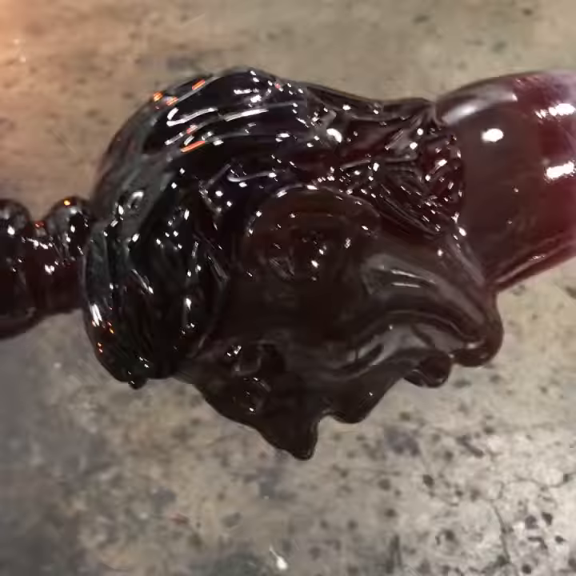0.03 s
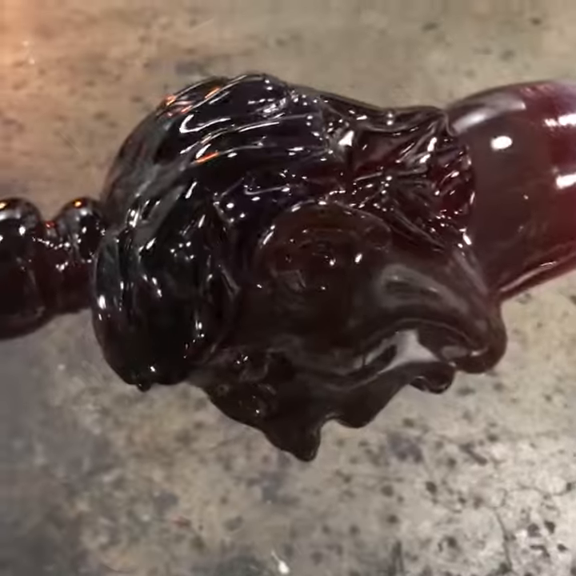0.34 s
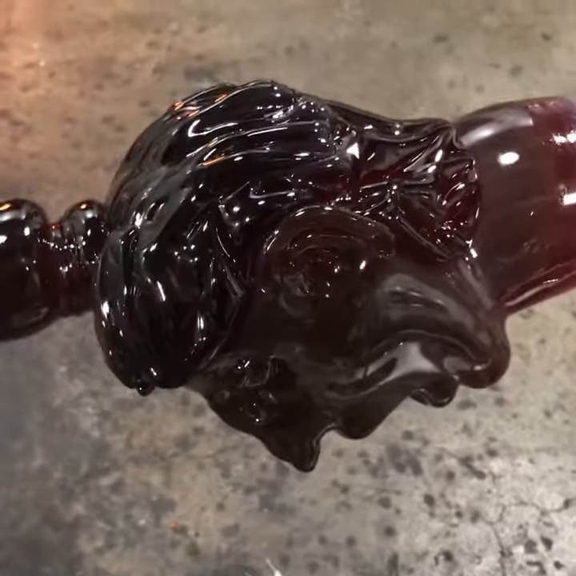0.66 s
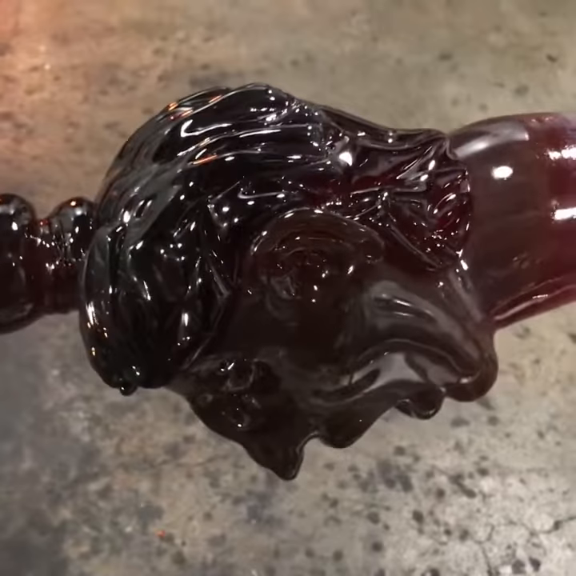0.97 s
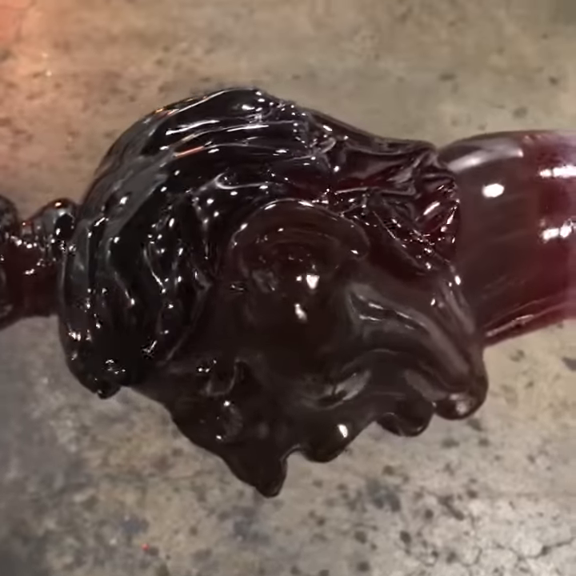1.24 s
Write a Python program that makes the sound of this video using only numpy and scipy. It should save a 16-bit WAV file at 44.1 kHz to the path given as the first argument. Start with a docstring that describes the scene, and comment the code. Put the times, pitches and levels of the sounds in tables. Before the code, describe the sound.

Gas furnaces roar steadily with rushing blower air in a large glass workshop.

```python
"""A large glass workshop, where gas furnaces and their blowers run without pause.
Turbulent flames lay down a low, throbbing roar, and the blowers fill the hall with rushing air.
Ducts and chambers ring in the draught, fans add faint wavering tones, and a thin hiss of gas
swells and fades on top. Rush and hiss glance off hard surfaces nearby.
One hand-held microphone, switched on just after the start, hears it all."""
import sys
import numpy as np
from scipy.fft import rfft, irfft
from scipy.io import wavfile
from scipy.ndimage import uniform_filter1d, map_coordinates

SR = 44100
rng = np.random.default_rng(int(sys.argv[2]) if len(sys.argv) > 2 else 0)


def transcribe(signal):
    """Save signal, clipped to [-1, 1], as a 16-bit WAV file at the path in sys.argv[1]."""
    frames = np.atleast_2d(signal).T
    limited = np.clip(frames, -1, 1)
    pcm = np.round(limited * 32767).astype(np.int16)
    wavfile.write(sys.argv[1], SR, pcm)


N = 176400
T = np.arange(N) / SR
HZ = np.maximum(np.arange(N // 2 + 1) * SR / N, 1)

# Tone colour of the flames. Each row: frequency in Hz, relative level in dB.
ROAR_SPECTRUM = [(15, -44), (27, -38), (33, -19), (38, -8), (44, -5), (55, 2.5), (63, 0), (71, -6.5),
                 (82, -1.5), (92, -1.5), (104, .5), (128, -0.2), (160, -9), (195, -11.5), (240, -15.5),
                 (320, -19.5), (600, -28), (2000, -60)]
# The flames throb harder. Each row: peak time in seconds, boost in dB.
FLAME_THROBS = [(.505, 5.5), (.89, 2.5), (1.76, 3.5), (2.41, 1), (3.56, 3)]
# Tone colour of the blowers. Each row: frequency in Hz, relative level in dB.
RUSH_SPECTRUM = [(25, -10), (100, 3.5), (250, -3), (350, 1.5), (470, -0.5), (620, -1), (700, 1), (765, -4),
                 (820, 0), (900, -0.5), (1000, -4), (1120, -4), (1350, -7), (1600, -6.5), (1920, -9.5),
                 (2150, -8.5), (2680, -13.5), (3050, -13), (3500, -17), (4600, -19), (4950, -22.5),
                 (5400, -22), (8000, -26.5), (15000, -30)]
# The blowers' nearly steady level. Each row: time in seconds, level in dB.
RUSH_ENVELOPE = [(.1, -35.5), (.7, -35), (1.3, -34.5), (1.8, -35), (2.3, -35.5), (2.9, -35.5), (3.4, -35),
                 (4, -35.5)]
# Duct and chamber resonances. Each row: pitch in Hz, half-width in Hz, level in dB.
DUCT_RESONANCES = [(178.5, 10.4, -44.5), (340, 8.6, -57), (404.7, 14, -49.5), (525, 15, -46.5),
                   (661, 9.4, -52), (709, 17, -52), (799.5, 8, -56), (971, 27, -49.5), (1033.7, 12.5, -50),
                   (1481, 17, -60.5), (1560, 19, -61.5), (1753, 22, -59), (1993, 7.9, -61.5),
                   (2072, 22, -61.5), (2890, 35, -61), (2997, 25, -64), (3785, 18, -64), (4010, 15, -69)]
# A duct briefly rings out. Each row: peak time in seconds, pitch in Hz, peak level in dB.
DUCT_RINGS = [(.48, 388.7, -37), (1.67, 711, -43.5), (3.24, 968, -43), (3.52, 330.6, -41.5),
              (3.82, 1036, -44)]
# Body of the gas hiss. Each row: frequency in Hz, relative level in dB.
HISS_SPECTRUM = [(1500, -13), (3000, 3), (4400, 1.5), (4950, -1), (5300, 1.5), (6700, 2.5), (7700, -3.5),
                 (9200, -1.5), (10400, -7), (13000, -11)]
# Finest spray of the hiss. Each row: frequency in Hz, relative level in dB.
SPRAY_SPECTRUM = [(5000, -28), (9000, -3), (10400, -7.5), (11400, -1), (13000, 1.5), (14000, .3),
                  (14700, 5), (15200, 0.4)]
# The hiss swells and fades. Each row: time in seconds, body level in dB before trim, spray level in dB.
HISS_ENVELOPE = [(.1, -49.5, -48.5), (.25, -52, -49), (.3, -44, -45.5), (.44, -48.5, -49), (.49, -46, -45),
                 (.66, -45, -46.5), (.73, -49.5, -49.5), (.86, -51.5, -49.5), (.95, -46, -49),
                 (1.13, -47, -44.5), (1.25, -47, -47), (1.43, -44, -45), (1.54, -49, -47.5),
                 (2.2, -50.5, -49.5), (2.7, -49.5, -47.5), (3.3, -49, -46), (3.68, -48, -46),
                 (3.98, -51.5, -52.5)]
# The hiss turns whistly.
# Each row: peak time in seconds, length in seconds, pitch in Hz, half-width in Hz, peak level in dB.
HISS_WHISTLES = [(.33, .14, 13350, 330, -52), (.39, .2, 9500, 260, -58), (.41, 0.1, 5070, 480, -51)]
# A fan hum dips, returns and fades back after the first second. Each row: time in seconds, level in dB.
HUM_ENVELOPE = [(.15, -40), (.35, -51), (.62, -54), (.8, -43.5), (1.4, -53), (4, -52)]
# The main fan tone comes and goes. Each row: time in seconds, level in dB.
FAN_ENVELOPE = [(0, -55), (.7, -55), (1.1, -49.5), (1.5, -56), (1.75, -45), (2.05, -65), (2.25, -45.5),
                (2.65, -44.5), (3.1, -55), (3.45, -54), (3.7, -43.5), (4, -57)]
# A faint high whine creeps in. Each row: time in seconds, level in dB.
WHINE_ENVELOPE = [(0, -78), (2, -71), (4, -65)]


def flames(gain_db=-28.5, evenness=0.74, even_over_s=0.22, throb_s=0.064):
    """Low combustion roar that flutters with the turbulence and now and then throbs."""
    roar = noise(colour(ROAR_SPECTRUM))
    swell = np.sqrt(uniform_filter1d(roar ** 2, int(even_over_s * SR)))
    even_roar = roar / swell ** evenness  # the steady gas feed evens out slow swells
    throb_db = sum(db * bump(peak_s, throb_s) for peak_s, db in FLAME_THROBS)
    return from_db(gain_db + throb_db) * flutter(depth_db=1.02) * even_roar


def blowers():
    """The blowers drive a broad rush of air that fills the hall."""
    return envelope(RUSH_ENVELOPE) * flutter(depth_db=0.76) * noise(colour(RUSH_SPECTRUM))


def ducts(ring_s=0.12):
    """The draught keeps ducts and chambers ringing; now and then one sings out."""
    bed = sum(from_db(db) * resonance(hz, width) for hz, width, db in DUCT_RESONANCES)
    rings = sum(from_db(db) * bump(peak_s, ring_s) * tone(hz, wander_hz=4.05)
                for peak_s, hz, db in DUCT_RINGS)
    return bed + rings


def gas_hiss(body_trim_db=-1):
    """Gas hisses in two swelling layers: a bright body and a fine spray above it."""
    times, body_db, spray_db = np.transpose(HISS_ENVELOPE)
    body = from_db(body_trim_db + np.interp(T, times, body_db)) * noise(colour(HISS_SPECTRUM))
    spray = from_db(np.interp(T, times, spray_db)) * noise(colour(SPRAY_SPECTRUM))
    return (body + spray) * flutter(depth_db=0.68)


def gas_whistles():
    """Narrow bands of the hiss flare up and fall away in its first surge."""
    return sum(from_db(db) * bump(peak_s, length_s) * resonance(hz, width)
               for peak_s, length_s, hz, width, db in HISS_WHISTLES)


def fans():
    """Running fans add three faint, wavering tones."""
    hum = envelope(HUM_ENVELOPE) * tone(hz=387, wander_hz=2.04)
    main = envelope(FAN_ENVELOPE) * tone(hz=531, wander_hz=3.5)
    whine = envelope(WHINE_ENVELOPE) * tone(hz=11150, wander_hz=6.6)
    return hum + main + whine


def nearby_surfaces(sound, count=10, echo_db=-7, low_cut_hz=1300, sway_s=0.00012):
    """Short echoes off hard surfaces ripple the top end, shifting as the microphone sways."""
    echo_gain = from_db(echo_db) / (1 + (low_cut_hz / HZ) ** 2)
    direct_spectrum = rfft(sound) / np.sqrt(1 + echo_gain ** 2)  # leaves room for the echoes' power
    reflected = irfft(direct_spectrum * echo_gain, N)
    delays_s = [delay + sway_s * drift(rate_hz=0.3) for delay in rng.uniform(0.002, 0.009, count)]
    echoes = sum(map_coordinates(reflected, [(T - delay) * SR], order=3) for delay in delays_s)
    return irfft(direct_spectrum, N) + echoes / np.sqrt(count)


def tone(hz, wander_hz, rate_hz=6, waver_db=1.0):
    """A sine at unit rms, unsteady in pitch and level."""
    phase = 2 * np.pi * np.cumsum(hz + wander_hz * drift(rate_hz)) / SR
    return rms_one(np.sin(phase) * from_db(waver_db * drift(rate_hz)))


def resonance(hz, half_width_hz):
    """Noise ringing around one pitch, at unit rms."""
    return noise(1 / (1 + ((HZ - hz) / half_width_hz) ** 2))


def noise(gain):
    """Noise at unit rms, shaped by a gain at each frequency."""
    return rms_one(irfft(rfft(rng.standard_normal(N)) * gain, N))


def colour(points):
    """An EQ curve through (Hz, dB) points, as gain."""
    hz, db = np.transpose(points)
    return from_db(np.interp(np.log(HZ), np.log(hz), db))


def envelope(points):
    """A fader ride through (seconds, dB) points, as gain."""
    return from_db(np.interp(T, *np.transpose(points)))


def flutter(depth_db, rate_hz=26):
    """A gain that trembles quickly at random."""
    return from_db(depth_db * drift(rate_hz))


def drift(rate_hz):
    """A smooth random wander at unit rms, mostly slower than the given rate."""
    return noise(1 / (1 + (HZ / rate_hz) ** 2))


def bump(peak_s, length_s):
    """A bell-shaped rise and fall."""
    return np.exp(-(2 * (T - peak_s) / length_s) ** 2)


def from_db(db):
    """Decibels to gain."""
    return 10 ** (np.asarray(db) / 20)


def rms_one(x):
    """Scale to unit rms."""
    return x / np.sqrt(np.mean(x ** 2) + 1e-20)


def scene():
    """The mono mix at the microphone; only rush and hiss carry echoes."""
    mix = flames() + ducts() + fans() + gas_whistles()
    mix += nearby_surfaces(blowers() + gas_hiss())
    return mix[None]


def record(dry, start_s=0.084, fade_in_s=0.002, cutoff_hz=15300):
    """The microphone switches on, and the top end is cut steeply."""
    fade_in = np.clip((T - start_s) / fade_in_s, 0, 1)
    high_cut = 1 / np.sqrt(1 + (HZ / cutoff_hz) ** 1200)
    return fade_in * irfft(rfft(dry) * high_cut, N)


dry = scene()
out = record(dry)
transcribe(out)
```